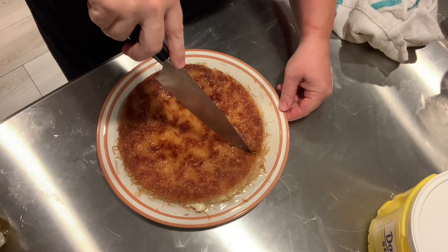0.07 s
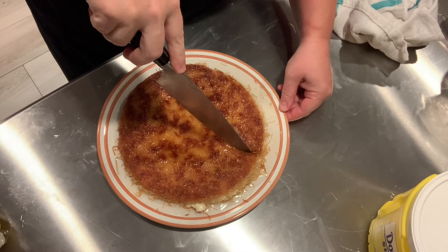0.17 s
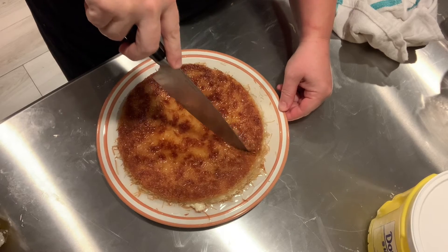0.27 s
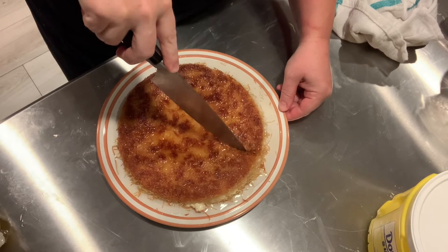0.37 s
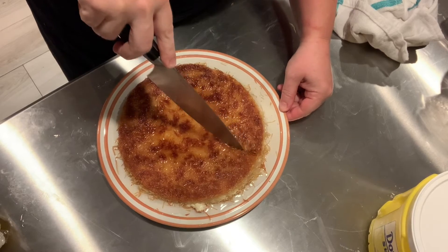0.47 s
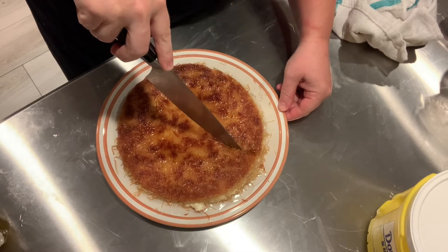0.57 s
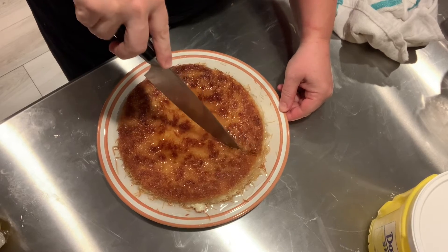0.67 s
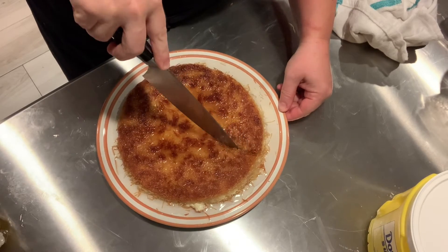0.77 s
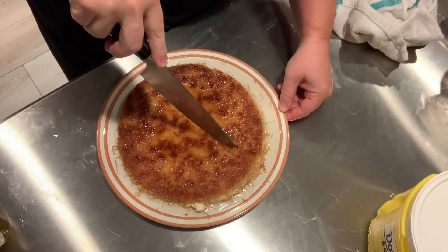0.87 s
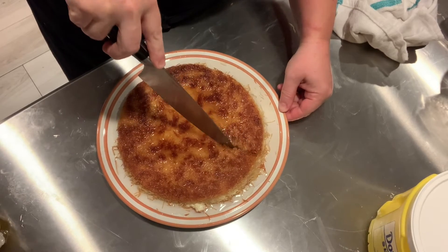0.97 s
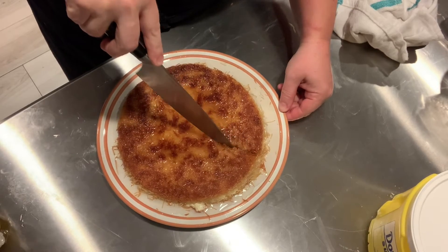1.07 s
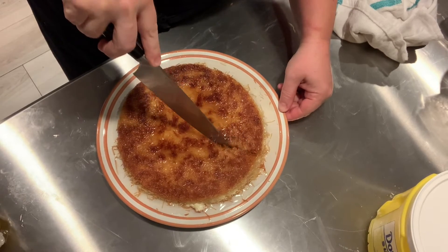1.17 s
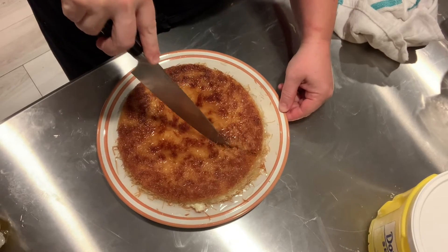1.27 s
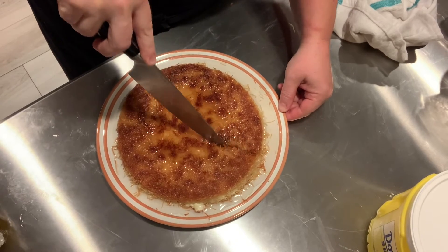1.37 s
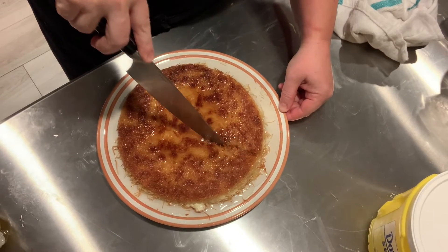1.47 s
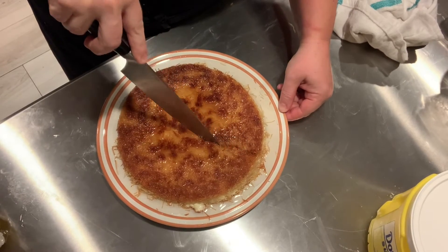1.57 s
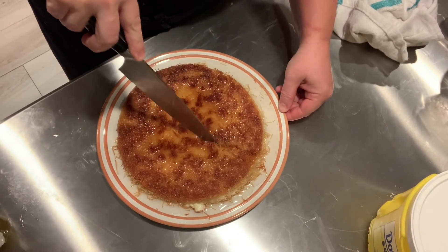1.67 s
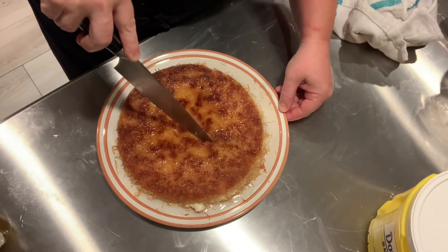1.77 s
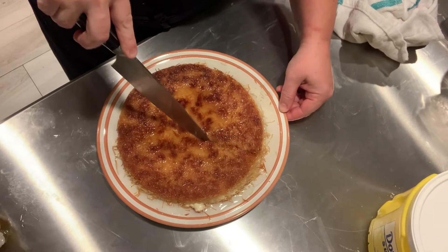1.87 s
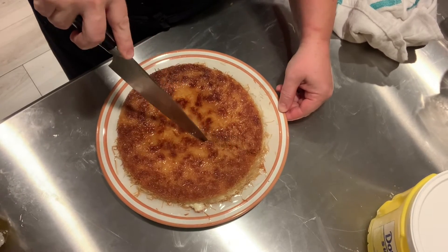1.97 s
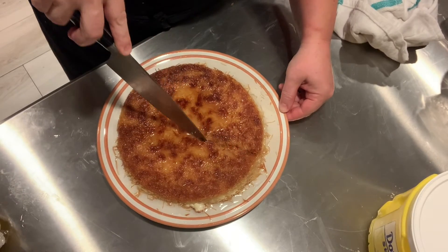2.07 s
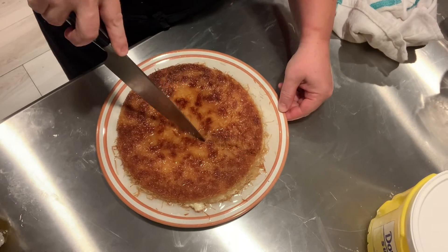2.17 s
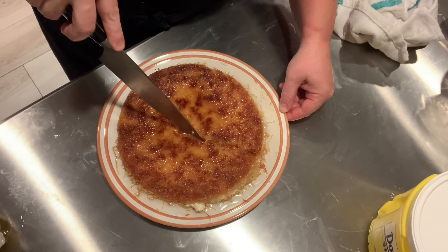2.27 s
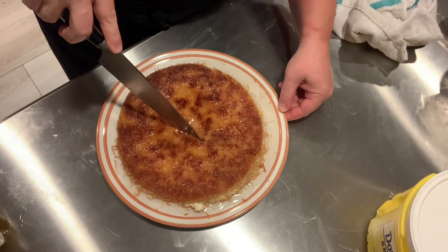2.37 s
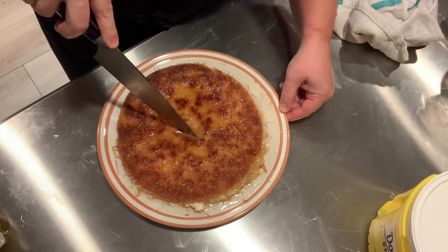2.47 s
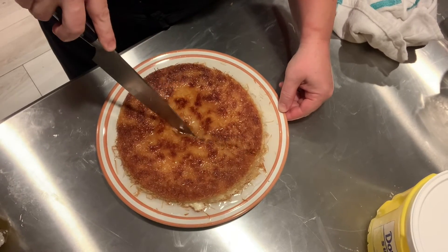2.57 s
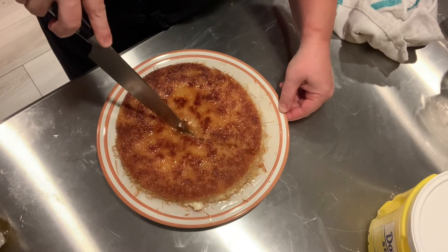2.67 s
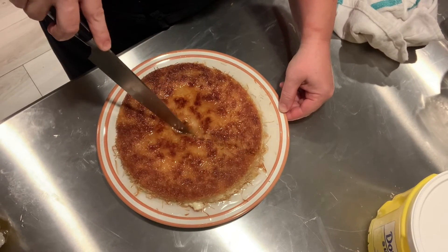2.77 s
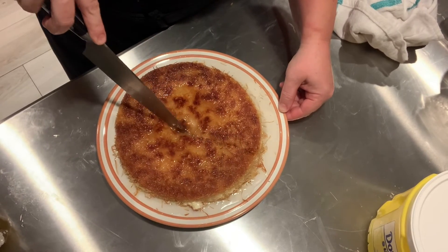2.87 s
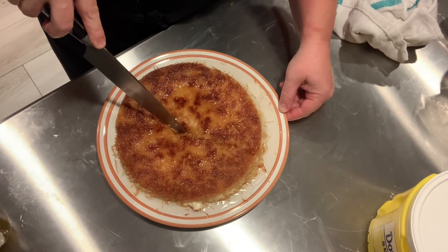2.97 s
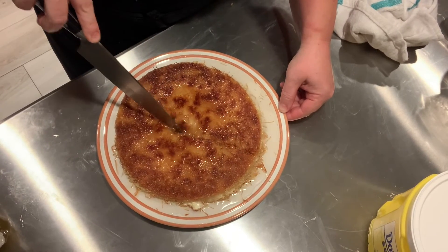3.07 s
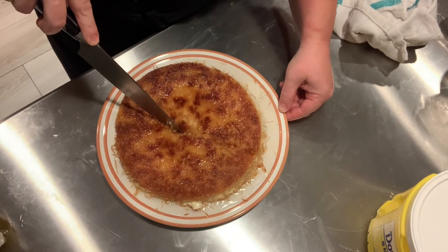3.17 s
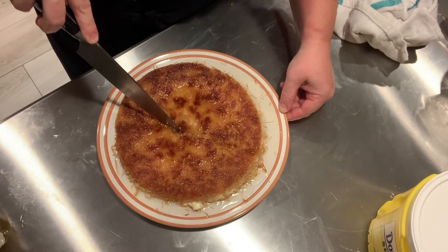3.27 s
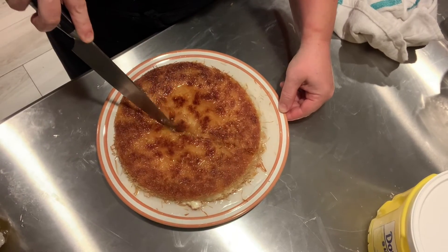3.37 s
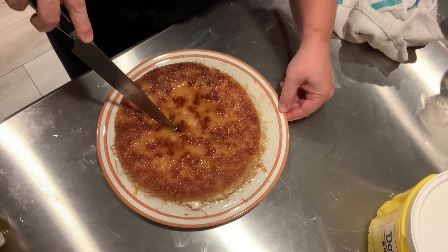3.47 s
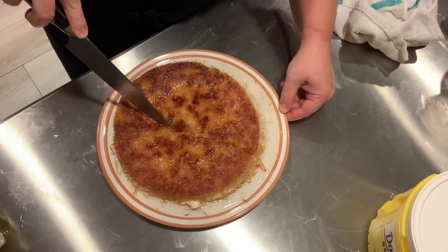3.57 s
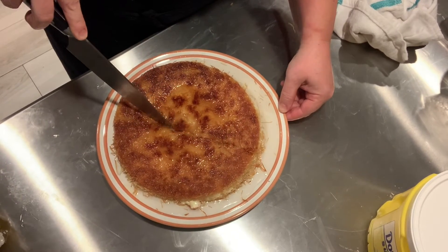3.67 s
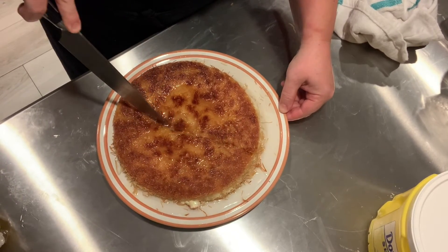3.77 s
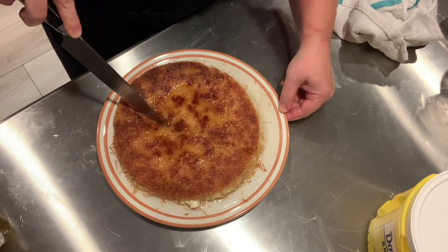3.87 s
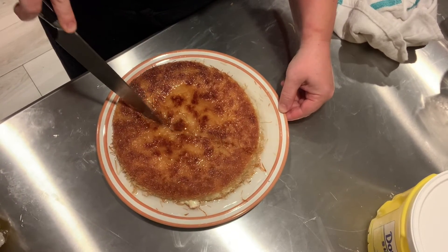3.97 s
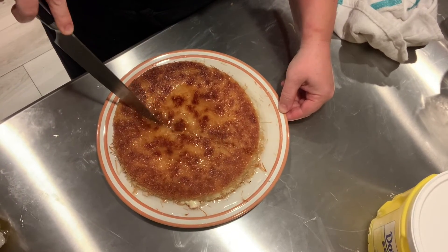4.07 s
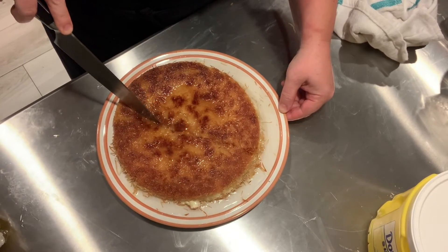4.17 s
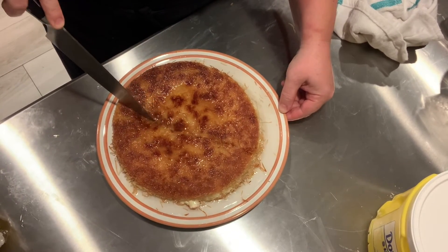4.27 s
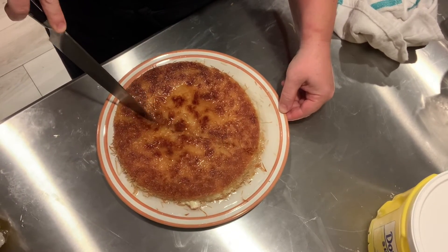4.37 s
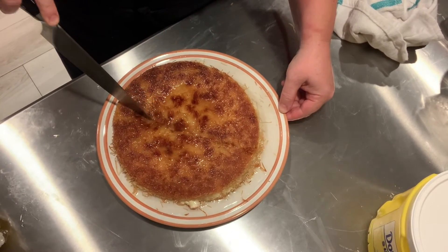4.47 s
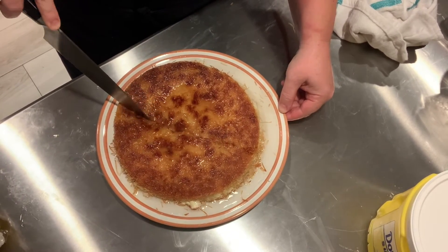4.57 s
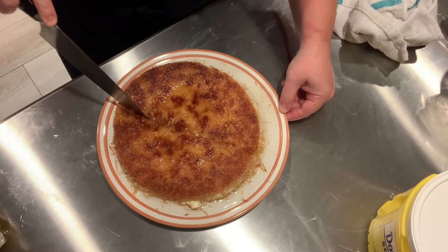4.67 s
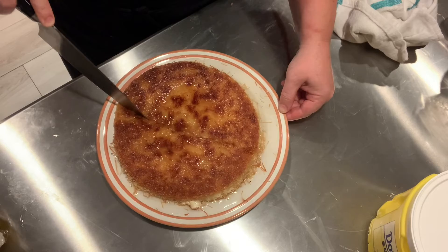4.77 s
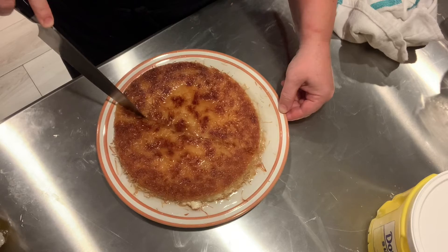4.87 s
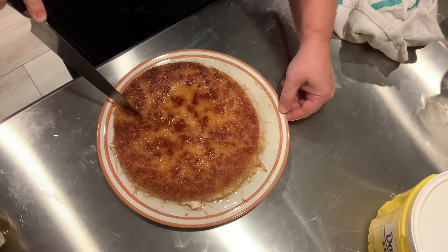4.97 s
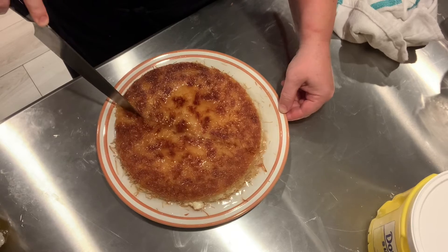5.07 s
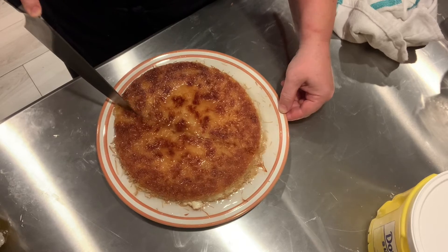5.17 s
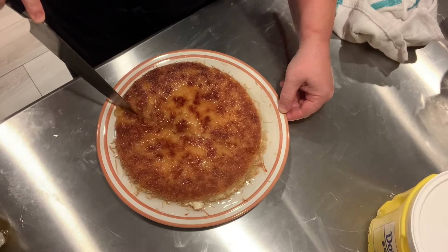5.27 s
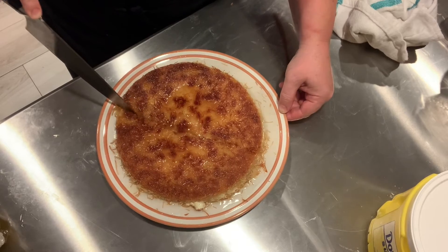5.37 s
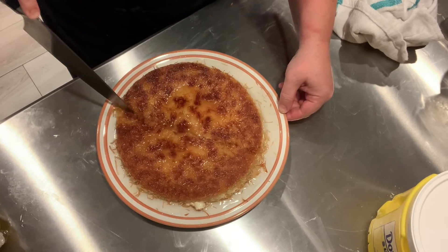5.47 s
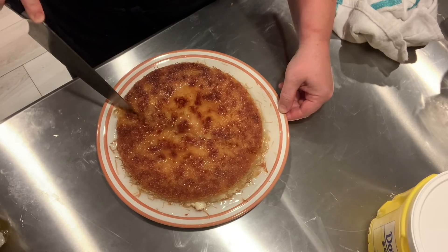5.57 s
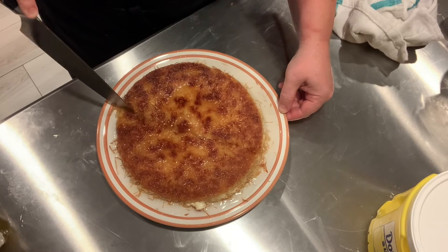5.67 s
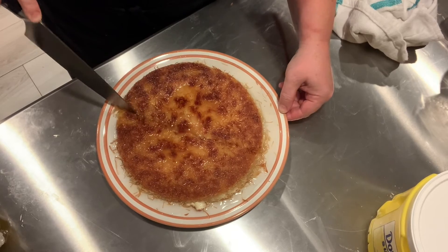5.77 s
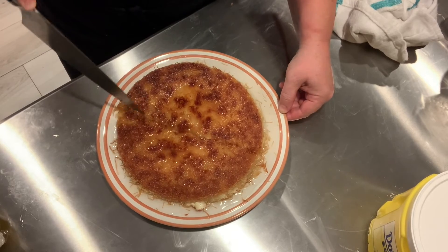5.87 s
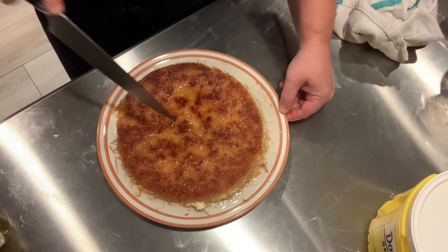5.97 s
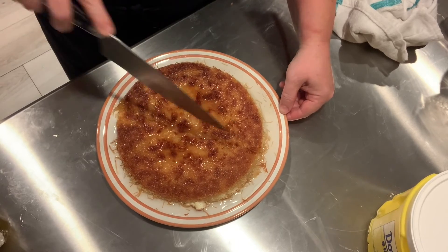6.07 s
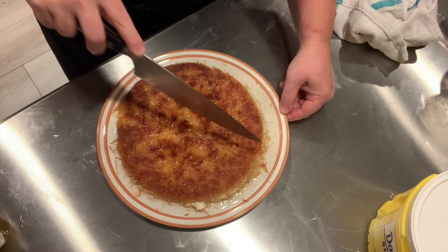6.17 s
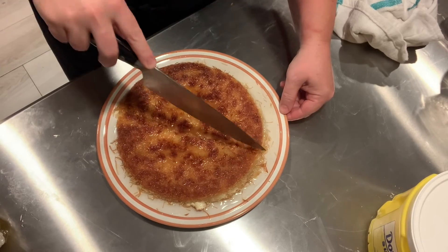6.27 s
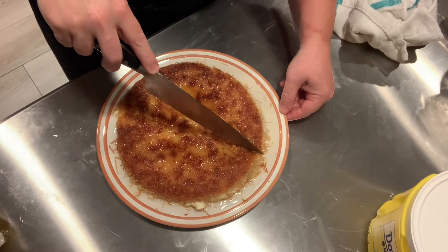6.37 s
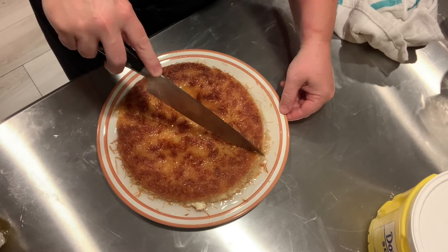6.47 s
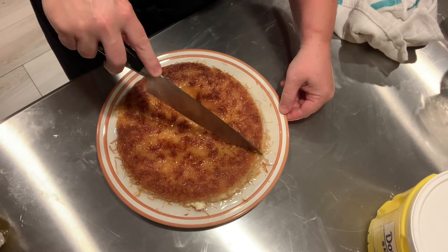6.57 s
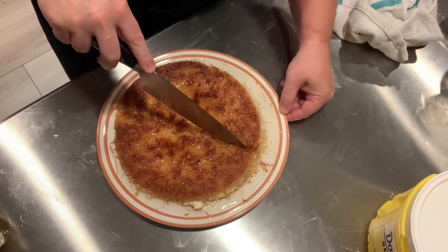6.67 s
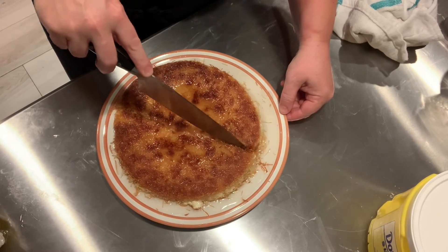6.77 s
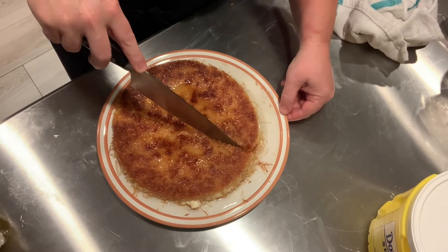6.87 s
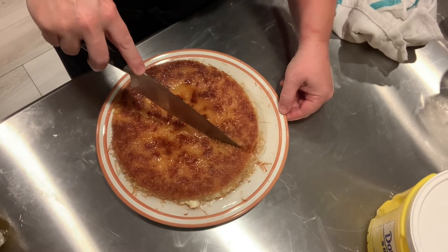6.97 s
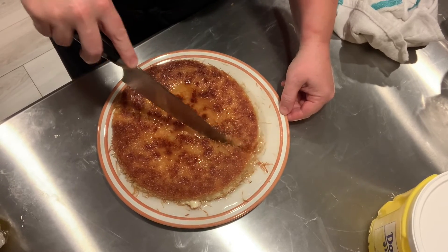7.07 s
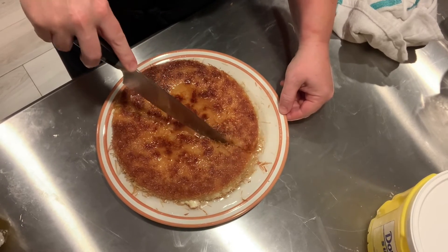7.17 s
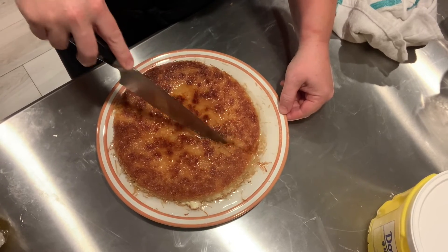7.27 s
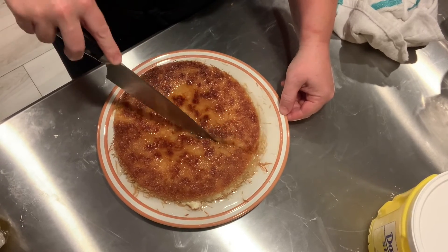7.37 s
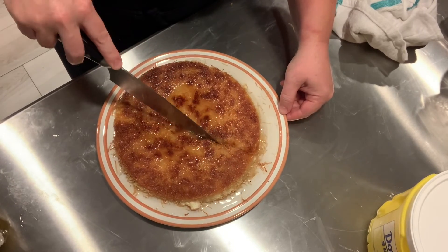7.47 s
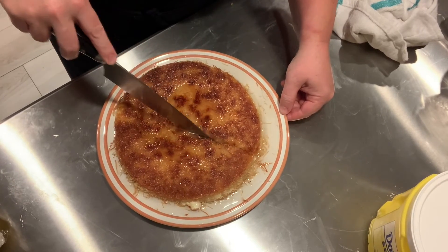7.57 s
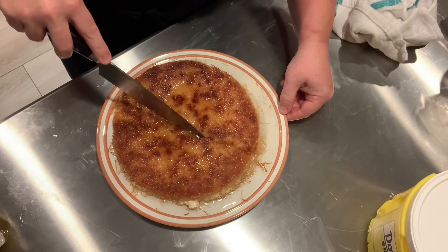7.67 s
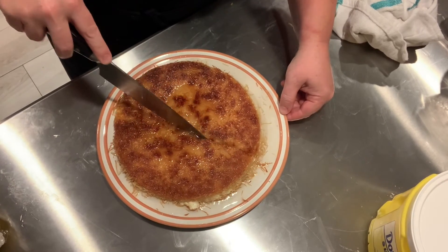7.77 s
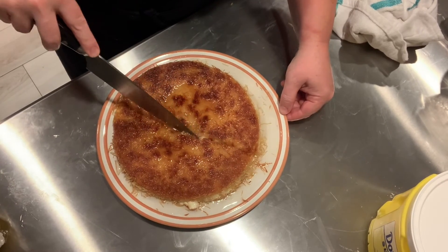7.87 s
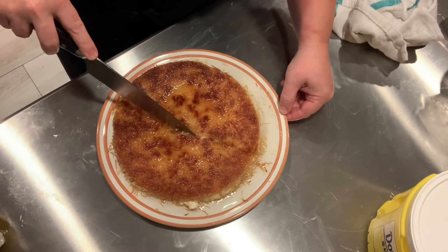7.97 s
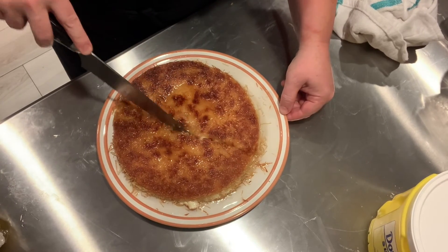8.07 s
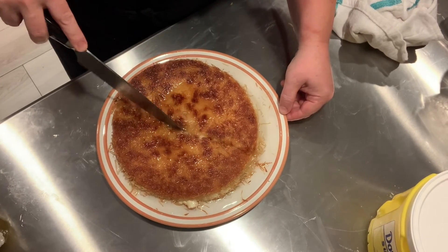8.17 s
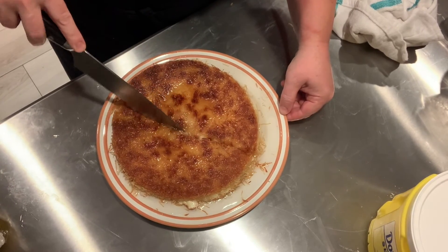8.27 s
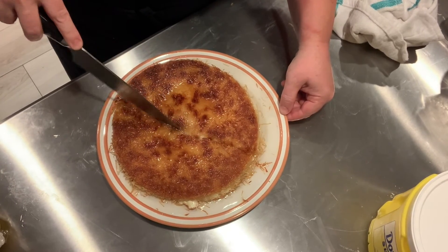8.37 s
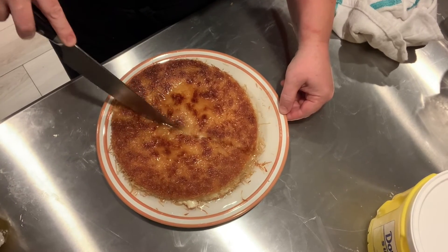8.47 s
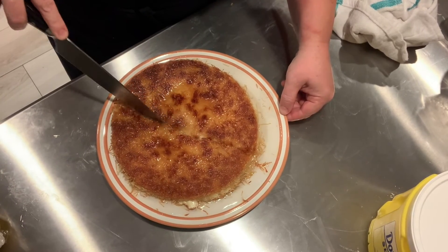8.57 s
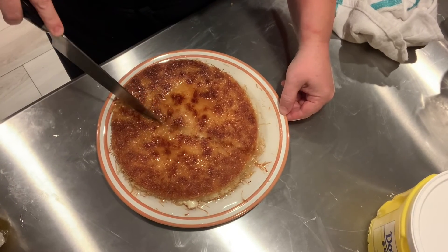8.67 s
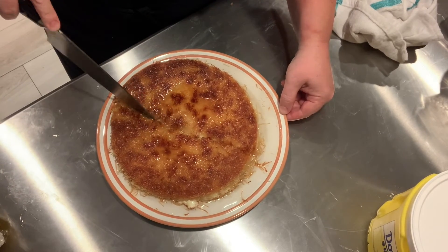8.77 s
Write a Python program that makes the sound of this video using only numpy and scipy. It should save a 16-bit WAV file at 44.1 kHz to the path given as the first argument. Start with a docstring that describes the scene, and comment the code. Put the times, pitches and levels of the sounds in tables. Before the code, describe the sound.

A large knife chops through crisp pastry on a ceramic plate, about five crunching knocks a second, with a short pause before a second run.

```python
"""Small hard kitchen, steel table, close microphone, in stereo: a large knife rocks through crisp pastry on a plate.
Random grains and snaps make the crust crackle before each knock, and softer grains make the base give way.
Each knock is a bank of decaying modes: plate and blade ring, the table top thumps, and a noise tick adds the edge.
Coloured grains and noise scrape, brush and slide between knocks.
Diffuse echoes surround it, over the low noise and wavering hum of ventilation."""
import sys
import numpy as np
from scipy import signal
from scipy.fft import rfft, irfft, next_fast_len
from scipy.io import wavfile
from scipy.ndimage import uniform_filter1d

SR = 44100
rng = np.random.default_rng(int(sys.argv[2]) if len(sys.argv) > 2 else 0)


def dump_mix(stems):
    """Bounce the given channels to the path in sys.argv[1] as a 16-bit WAV at rate SR."""
    frames = np.atleast_2d(stems).T  # one column per channel
    limited = np.clip(frames, -1, 1)  # hard clip at full scale
    pcm = np.round(limited * 32767).astype(np.int16)
    wavfile.write(sys.argv[1], SR, pcm)


N = 389403  # length in samples

# Levels are relative: each source also has its own gain.
# strokes of the knife: (blade meets plate t/s, force level/dB, time in the crust before that t/s, crunch level/dB)
STROKES = [(0.1715, 6, 0.049, -58), (0.386, 7, 0.022, -48.5), (0.6069, 0.5, 0.041, -52.5),
           (0.814, -2.5, 0.025, -55.5), (1.0233, -4.5, 0.027, -59), (1.2371, -14.5, 0.037, -54),
           (1.422, -3, 0.024, -59), (1.6092, 0, 0.026, -68), (1.8113, 4.5, 0.017, -60),
           (1.995, 1, 0.018, -67), (2.1847, -8.5, 0.021, -75), (2.3673, 3, 0.021, -67),
           (2.581, -29, 0.031, -63.5), (2.761, -4, 0.02, -63.5), (2.9817, -3.5, 0.017, -67),
           (3.213, -13, 0.044, -64), (3.4303, -11.5, 0.026, -62.5), (3.641, 4, 0.024, -55.5),
           (3.8806, -3.5, 0.027, -53), (4.122, -0.5, 0.036, -50.5), (4.3716, -11.5, 0.059, -51.5),
           (4.61, -27, 0.055, -52), (4.8556, -14, .055, -53.5), (5.09, -34, 0.054, -58),
           (5.317, -30, .032, -47.5), (5.537, -12, 0.023, -61), (5.741, -17.5, 0.0076, -78),
           (6.5671, 3, 0.02, -55), (6.7681, -18, 0.044, -56), (6.9493, -2.5, 0.017, -59.5),
           (7.1805, -2, 0.021, -66), (7.443, -15.5, 0.017, -65), (7.9694, -5, 0.018, -56)]
# how the blade meets the plate as it works across it: (t/s, centre of the ring f/Hz, ring over body level/dB,
# edge tick over body level/dB, main mode over the rest level/dB, blade over body level/dB)
CONTACT = [(.17, 1240, -8, -14.5, 3, -42), (.39, 1460, -6, -11.5, -9, -34), (.6, 1660, -11, -21, -3, -51),
           (1.02, 2190, -3, -13, 0, -36), (1.42, 1700, -10, -26.5, -16, -54),
           (1.81, 1900, 4.5, -5.5, -2.5, -18), (2, 1900, 5, -7.5, -3, -19), (2.37, 1580, 5, -6, 0, -27),
           (2.76, 1510, 1.5, -13, -8.5, -37), (3.21, 1404, 0, -17, -2, -39.5),
           (3.43, 1450, -1.5, -22, -5, -38), (3.64, 1675, 2.5, -9, -13, -24.5),
           (4.12, 1760, 2.5, -6.5, -3.5, -22), (4.37, 1800, -14.5, -25.5, 5, -45.5),
           (4.86, 1850, -10.5, -18.5, -0.5, -33), (6.57, 1580, -5, -5.5, 5, -42),
           (6.95, 2260, -4.5, -6.5, -4, -43), (7.44, 1900, -2, -10.5, 4, -27.5),
           (7.97, 1720, 9.5, -1.5, 6.5, -30)]
# the blade works its way from right to left, twice: (t/s, lag of the left port t/s)
PLACE = [(.3, .00008), (3, .00003), (5.3, -.00004), (6.5, .00001), (8, -.00006)]
# nominal modes of the plate, its lower body, the table top: (f/Hz, level/dB, 60 dB decay t/s)
PLATE_RING = [(979, 11, 0.028), (1272, 6.5, 0.0224), (1397, 3.5, 0.025), (1617, 5, 0.028),
              (1833, 10, 0.025), (2020, 6, 0.027), (2139, 0, 0.038), (2200, 1, 0.029), (2905, -6, 0.025)]
PLATE_BODY = [(407.7, 1.7, 0.053), (475.7, 4.6, 0.052), (614.8, 6.5, 0.051), (728, 0.9, 0.028),
              (822, 4.1, 0.022)]
TABLE_TOP = [(95.5, -8, 0.2), (129.1, -12.5, 0.021), (163.4, -5, 0.11), (203.9, 4, 0.097),
             (234, -2.5, 0.072), (251.8, -0.5, 0.074)]
# centres of the blade's clusters of close modes: (f/Hz, level/dB, 60 dB decay t/s)
BLADE = [(3380, -9.5, 0.22), (3980, 3.5, 0.21), (5060, 4.5, 0.21), (5900, -16.5, 0.38)]
# damped mode of the free blade tip, woken by scraping: (f/Hz, level/dB, 60 dB decay t/s)
BLADE_TIP = [(3760, 1, 0.06)]
# largest flakes snapping on their own: (t/s, level/dB)
SNAPS = [(0.142, -22.5), (0.158, -26.5), (0.675, -33), (0.903, -32), (1.2037, -33), (3.07, -35),
         (4.069, -30.5), (4.246, -31.5), (4.323, -22), (4.5798, -23), (4.898, -34.5), (4.914, -36),
         (5.033, -26), (5.0747, -23), (5.268, -32), (6.498, -26), (6.52, -31.5)]
# crumbs clinging to the blade as it is drawn back, a curve: (t/s, rustle level/dB)
CRUMBS = [(.2, -70), (.8, -65.5), (1.6, -65.5), (2.4, -88), (3.6, -70), (4.2, -63.5), (4.9, -57.5),
          (5.1, -62), (5.6, -72), (7.2, -77), (8, -98.5)]
# edge rubbing along the plate: (start t/s, end t/s, level/dB)
SCRAPES = [(0, 0.13, -52.5), (2.56, 2.6, -52.5), (4.33, 4.39, -53.5), (4.57, 4.64, -57), (4.78, 5.1, -65.5),
           (5.27, 5.35, -51.5), (5.525, 5.62, -48), (5.64, 5.675, -52), (5.742, 5.79, -48.5),
           (5.8, 5.84, -55)]
# plate pushed and juddering on the table: (start t/s, end t/s, level/dB)
SHOVES = [(4.87, 4.94, -45.5), (5.28, 5.345, -37.5), (5.54, 5.63, -43.5), (6.77, 6.8, -39.5)]
# blade brushing the crust without cutting: (start t/s, end t/s, level/dB)
BRUSHES = [(0.019, 0.083, -57), (6.369, 6.398, -63.5), (8.501, 8.554, -68)]
# flat of the blade sliding softly through the open cut: (start t/s, length t/s, level/dB)
SLIDES = [(7.561, 0.095, -54.5), (7.682, 0.1, -50.5), (7.802, 0.098, -52.5), (8.33, 0.25, -61),
          (8.598, 0.13, -59), (8.744, 0.11, -60)]
# plate tipping and dropping back on the table: (t/s, level/dB, plate over table level/dB)
SETTLES = [(0.426, 0, -3.5), (4.611, -13, -6.5), (5.103, -9.5, -13.5), (6.819, -4.5, -21)]
# scraping edge catching and tapping the plate lightly: (t/s, level/dB)
TAPS = [(4.626, -29.5), (5.316, -26.5), (5.645, -30), (5.768, -27.5), (5.783, -31), (5.826, -25),
        (6.726, -30), (7.952, -21)]
# spectra of edge tick, crust, soft base, rubbing, judder, sliding and ventilation: (f/Hz, density level/dB)
EDGE_COLOUR = [(800, 0), (2200, 6), (2480, -8), (2900, -3.5), (3550, -5), (4020, 0.5), (4650, -7),
               (5120, -1), (6100, -10.5), (8200, -16), (11400, -12.5), (15500, -26.5)]
CRUST_COLOUR = [(300, -15.5), (1000, 0), (2000, -5.5), (2900, -8), (3900, -6), (7000, -7.5), (11400, -2.5),
                (15500, -2)]
BASE_COLOUR = [(200, -21), (500, 5.5), (900, -5), (1600, 0.5), (2300, -11.5), (3000, -16.5), (9000, -51.5)]
RUB_COLOUR = [(200, -5.5), (420, 9), (850, 11.5), (1300, -3), (2200, 2.5), (2800, -13.5), (4500, -11.5),
              (6500, -18), (12000, -28)]
JUDDER_COLOUR = [(40, -41), (90, 11.5), (135, -4), (205, -0.5), (255, 7), (310, -22), (420, -2),
                 (620, -18.5), (1200, -48), (4000, -51)]
SLIDE_COLOUR = [(300, 2), (700, -6), (1050, -6.5), (1500, 0.5), (2150, -5), (2700, -28.5), (4000, -23.5),
                (6000, -35.5), (14000, -36.5)]
VENT_COLOUR = [(15, -56), (25, -22), (48, -9), (95, -2), (170, -8.5), (223, -6), (285, -20), (373, -16.5),
               (800, -30.5), (7000, -58.5), (16000, -72.5)]
# echoes of the kitchen in bands: (centre f/Hz, echo level/dB, 60 dB decay t/s)
KITCHEN = [(90, -5, 0.64), (238, -16.5, 0.028), (436, -3.5, 0.32), (535.5, -6.5, 0.22), (885, -8, 0.37),
           (1900, -5.5, 0.39), (4530, -3.5, 0.39), (8200, -6, 0.15), (15000, -11.5, 0.84)]

MAIN_MODE = 4  # index of the plate's main mode in PLATE_RING
THUMP_GROWTH = 0.93  # dB of table thump per dB of force
DRAW_AFTER_S, DRAW_S = 0.085, 0.07  # the blade is drawn back this long after each knock, for this long
# treble common to both channels: crossover, shared power 0-1, delay on the right
TREBLE_HZ, TREBLE_SHARE, TREBLE_LAG_S = 6400, .85, .000262
CEILING = .88  # sample value towards which peaks are rounded
TOP_HZ = 16100  # cutoff of the very top


def knocks(thump_db=-3.0, body_db=0, ring_db=2, tick_db=-1, blade_db=1,
           rebound_s=0.02052, rebound_db=-12, tick_s=0.006):
    """The edge ticks on the glaze, plate and blade ring, and the table top takes the blow and rebounds."""
    out, ticks = np.zeros((2, 2, N))
    t = seconds(0.032)
    for at, force, _, _ in STROKES:
        centre_hz, ring_over, tick_over, main_db, blade_over = follow(CONTACT, at)
        thump = THUMP_GROWTH * force
        # where the blade lands sets the main mode: weak near one of its nodes
        modes = [(hz, db + main_db * (k == MAIN_MODE), t60) for k, (hz, db, t60) in enumerate(PLATE_RING)]
        modes = pressed(modes, spread=.01)
        plate = ring(modes, at, rise_s=.0003, skew=.2, stagger_s=.0003, centre_hz=centre_hz)
        body = ring(pressed(PLATE_BODY, spread=.025), at, rise_s=.0005, skew=.14, stagger_s=.0008)
        table = ring(TABLE_TOP, at, rise_s=0.0038, skew=0.063, stagger_s=0.0012)
        rebound = ring(TABLE_TOP, at, rise_s=0.0032, skew=.05, stagger_s=0.0027)
        add(out, at + 0.00019, undb(force + ring_over + ring_db) * plate)
        add(out, at, undb(force + body_db) * body)
        add(out, at, undb(force + blade_over + blade_db) * blade_ring(at))
        add(out, at + 0.0022, undb(thump + thump_db) * table)
        add(out, at + rebound_s, undb(thump + rebound_db) * rebound)
        tick = np.exp(-t / tick_s) * noise(len(t), width=0.94)
        add(ticks, at - .001, undb(force + tick_over + tick_db) * unit(tick))
    return out + colour(ticks, EDGE_COLOUR)


def blade_ring(at, count=5):
    """The blade's answer to a blow: each cluster of close modes beats into a metallic band."""
    modes = []
    for hz, db, t60 in BLADE:
        for _ in range(count):
            modes.append((hz * (1 + .007 * rng.standard_normal()), db, t60))
    return ring(modes, at, rise_s=.002, skew=.6, stagger_s=.004)


def pressed(modes, spread):
    """The pastry and the hand load the plate differently at each stroke, which moves its modes a little."""
    return [(hz * (1 + spread * rng.standard_normal()), db, t60) for hz, db, t60 in modes]


def crust(crunch_db=2, draw_db=2, snap_db=6, entry_db=24, overrun_s=0.007, snap_s=0.0053, brittle_db=-55):
    """The brittle top snaps as the edge enters, crackles until the blade is down, and rustles on the draw back."""
    bites = [(at - lead, at + overrun_s, db) for at, _, lead, db in STROKES]
    draws = []
    for at, _, _, _ in STROKES:
        start = at + DRAW_AFTER_S
        draws.append((start, start + DRAW_S, *follow(CRUMBS, at)))
    out = undb(crunch_db) * grains(bites, per_s=900, patchy_db=9, fade_s=0.0065, width=0.7)
    out += undb(draw_db) * grains(draws, per_s=1200, patchy_db=8, fade_s=0.04, width=1.0)
    # the crust breaks before the first snap can grow beyond a certain size
    entries = [(start, min(db, brittle_db) + entry_db) for start, _, db in bites]
    t = seconds(0.0092)
    for at, db in entries + SNAPS:
        snap = np.exp(-t / snap_s) * noise(len(t), width=1.0)
        add(out, at, undb(db + snap_db) * unit(snap))
    return colour(out, CRUST_COLOUR)


def pastry_base(before_s=.009, before_db=-46, after_s=0.016, after_db=-38.5):
    """The soft base gives way just ahead of each knock and is crushed against the plate right after it."""
    ahead, behind = [], []
    for at, force, _, _ in STROKES:
        ring_over = follow(CONTACT, at)[1]
        ahead.append((at - before_s, at, force + max(ring_over, 0) + before_db))
        behind.append((at + 0.002, at + after_s, force + after_db))
    crushing = grains(ahead + behind, per_s=3500, patchy_db=1.5, fade_s=0.0046, width=0.9)
    return colour(crushing, BASE_COLOUR)


def small_knocks(tap_body_db=-3):
    """The settling plate thumps the table and sounds its lowest modes; light edge taps ring the plate alone."""
    out = np.zeros((2, N))
    for at, db, foot_db in SETTLES:
        table = ring(TABLE_TOP, at, rise_s=0.02, skew=0.11, stagger_s=0.002)
        foot = ring(PLATE_BODY[:2], at, rise_s=0.003, skew=.1, stagger_s=0.00094)
        add(out, at, undb(db) * table)
        add(out, at, undb(db + foot_db) * foot)
    for at, db in TAPS:
        plate = ring(PLATE_RING, at, rise_s=.0005, skew=.2, stagger_s=.002)
        body = ring(PLATE_BODY, at, rise_s=.0005, skew=.14, stagger_s=.002)
        add(out, at, undb(db) * plate)
        add(out, at, undb(db + tap_body_db) * body)
    return out


def friction(scrape_db=-2, shove_db=-2, tip_db=-23):
    """The edge rubs grittily on the plate and sets the blade tip ringing; the plate judders on the table."""
    rub = grains(SCRAPES, per_s=1400, patchy_db=7, fade_s=.012, width=.4, patch_s=.008)
    judder = grains(SHOVES, per_s=900, patchy_db=3, fade_s=.01, width=.12)
    tip = convolve(rub, ring(BLADE_TIP, 0, rise_s=.001, skew=.6, stagger_s=.001))
    out = undb(scrape_db) * colour(rub, RUB_COLOUR)
    return out + undb(tip_db) * tip + undb(shove_db) * colour(judder, JUDDER_COLOUR)


def sliding(grit_db=3, grit_s=0.0075):
    """Each slide swells and fades with the speed of the hand, catching a little on the way."""
    out = np.zeros((2, N))
    for start, length, db in SLIDES:
        t = seconds(length)
        catch = np.interp(t / grit_s, np.arange(len(t)), rng.standard_normal(len(t)))
        speed = np.sin(np.pi * t / length) ** 2
        add(out, start, undb(db + grit_db * catch) * speed * noise(len(t), width=0.84))
    return colour(out, SLIDE_COLOUR)


def brushing(grit_db=-4, sing_db=-7):
    """The edge skims the crust; held so lightly, the blade rings along."""
    brush = grains(BRUSHES, per_s=1800, patchy_db=4, fade_s=.015, width=.7)
    return undb(grit_db) * colour(brush, CRUST_COLOUR) + undb(sing_db) * convolve(brush, blade_ring(0))


def radiated(x, lowest_hz=60):
    """Plate and table top are too small to radiate deep bass."""
    return signal.sosfilt(signal.butter(2, lowest_hz, "high", fs=SR, output="sos"), x)


def kitchen(dry, first_s=0.0085, build_s=0.0014, wide_hz=1100):
    """Diffuse echoes that die at their own pace in each band; the bass is alike left and right."""
    t = np.arange(2 ** 15) / SR
    hz = np.fft.rfftfreq(2 * len(t), 1 / SR)
    points, levels, t60s = np.transpose(KITCHEN)
    onset = np.clip((t - first_s) / build_s, 0, 1)
    spectrum = 0
    for band, db, t60 in zip(np.eye(len(points)), levels, t60s):
        weight = undb(db) * np.sqrt(along(hz, points, band))
        spectrum = spectrum + weight * even_tail(t60, onset, t)
    response = irfft(stereo(*spectrum, np.minimum(hz / wide_hz, 1)))
    return convolve(dry, response[:, :len(t)])


def even_tail(t60, onset, t):
    """Spectra of two unrelated decaying noises, evened across frequency so that no single tone stands out."""
    tail = rng.standard_normal((2, len(t))) * onset * undb(-60 * t / t60)
    spectrum = rfft(tail, 2 * len(t))
    return spectrum / np.sqrt(uniform_filter1d(np.abs(spectrum) ** 2, size=15))


def ventilation(air_db=-50.5, hum_hz=166, hum_db=-58):
    """A steady rumble of moving air, with the hum of a fan wavering in level and phase."""
    air = noise(N, width=.18)
    t = np.arange(N) / SR
    knots = np.arange(0, N / SR + 1, .08)
    swell, drift = (np.interp(t, knots, v) for v in rng.standard_normal((2, len(knots))))
    hum = (1 + 1.44 * swell) * np.sin(2 * np.pi * hum_hz * t + drift)
    return undb(air_db) * colour(air, VENT_COLOUR) + undb(hum_db) * hum


def ring(modes, at, rise_s, skew, stagger_s, centre_hz=None, span_hz=560, right_db=7, right_hz=2050):
    """One blow on a set of decaying modes, with random shares and pitches, starting a little out of step."""
    hz, db, t60 = np.transpose(modes)[:, :, None]
    share, detune, offset = rng.standard_normal((3, len(hz), 1))
    t = np.maximum(seconds(min(t60.max(), .5)) - stagger_s * rng.random((len(hz), 1)), 0)
    hz = hz * (1 + .007 * detune)
    db = db + 1.4 * share
    pan_db = 0
    if centre_hz is not None:
        # modes far from the centre of the ring are weaker, by 12 dB at most
        db = db - np.minimum(6 * ((hz - centre_hz) / span_hz) ** 2, 12)
        # the highest modes of the plate are stronger on the right
        pan_db = right_db * np.minimum(hz / right_hz, 1) ** 6
    # half of the phase between the ports: random skew plus the lag of the place
    lead = skew * offset + np.pi * hz * np.interp(at, *np.transpose(PLACE))
    fade = undb(db - 60 * t / t60) * (1 - np.exp(-t / rise_s))
    ports = []
    for side in (-1, 1):  # left, right
        wave = np.sin(2 * np.pi * hz * t + side * lead)
        ports.append(fade * undb(side * pan_db / 2) * wave)
    return unit(np.sum(ports, axis=1))


def grains(spans, per_s, patchy_db, fade_s, width, patch_s=0.0035):
    """Tiny fractures at random moments within each span, in flurries as the material gives way."""
    out = np.zeros((2, N))
    for start, end, db in spans:
        t = seconds(max(end - start, .008) + fade_s)
        swell = np.clip(np.minimum(t, t[-1] - t) / fade_s, 0, 1)
        flurry = np.interp(t / patch_s, np.arange(len(t)), rng.uniform(-1, 1, len(t)))
        struck = rng.random(len(t)) < per_s / SR
        clicks = swell * undb(patchy_db * flurry) * struck
        burst = unit(clicks * noise(len(t), width))
        add(out, start - fade_s / 2, burst * undb(db) * np.sqrt(len(t)))  # level is mean power over the span
    return out


def noise(length, width):
    """White stereo noise; the width sets its opposed part."""
    return stereo(*rng.standard_normal((2, length)), width)


def stereo(mid, side, width):
    """Left and right from a shared and an opposed part."""
    return np.array([mid + width * side, mid - width * side]) / np.hypot(1, width)


def colour(x, points, size=4096):
    """Causal minimum-phase filter with the given spectrum and unit power gain."""
    log_gain = np.log(undb(along(np.fft.rfftfreq(size, 1 / SR), *np.transpose(points))))
    cepstrum = irfft(log_gain)
    # folding the cepstrum forward makes the response causal
    cepstrum[1:size // 2] *= 2
    cepstrum[size // 2 + 1:] = 0
    return convolve(x, unit(irfft(np.exp(rfft(cepstrum)))))


def convolve(x, response):
    """Filter by an impulse response, within the length of the scene."""
    return signal.fftconvolve(x, np.atleast_2d(response), axes=-1)[:, :N]


def follow(curve, at):
    """Read every column of a control curve at a time."""
    times, *columns = np.transpose(curve)
    return [np.interp(at, times, column) for column in columns]


def along(hz, points, values):
    """Read a curve on a log-frequency axis."""
    return np.interp(np.log(hz + 1), np.log(points), values)


def undb(db):
    """Amplitude of a level in dB."""
    return 10 ** (np.asarray(db) / 20)


def unit(x):
    """Scale to a mean energy of one per channel."""
    return x / np.sqrt(np.mean(np.sum(x ** 2, axis=-1)) + 1e-18)


def seconds(length):
    """Sample times over a length in seconds."""
    return np.arange(int(length * SR)) / SR


def add(out, at, x):
    """Mix a sound in at a time."""
    i = max(int(at * SR), 0)
    out[:, i:i + x.shape[-1]] += x[..., :max(N - i, 0)]


def scene():
    """Knife, pastry and plate on the table, with the kitchen's echoes and ventilation."""
    cutting = knocks() + crust() + pastry_base()
    handling = small_knocks() + friction() + sliding() + brushing()
    dry = radiated(cutting + handling)
    return dry + kitchen(dry) + ventilation()


def record(dry):
    """The treble is nearly the same in both channels, later on the right; peaks are rounded, the very top cut."""
    size = next_fast_len(N)
    hz = np.fft.rfftfreq(size, 1 / SR)
    left, right = rfft(dry, size)
    shared = TREBLE_SHARE * (1 + np.tanh((hz - TREBLE_HZ) / 500)) / 2
    late_left = left * np.exp(-2j * np.pi * hz * TREBLE_LAG_S)
    right = np.sqrt(1 - shared) * right + np.sqrt(shared) * late_left
    heard = irfft(np.array([left, right]), size)[:, :N]
    heard = heard / (1 + (heard / CEILING) ** 8) ** (1 / 8)
    return signal.sosfilt(signal.ellip(8, .2, 70, TOP_HZ, fs=SR, output="sos"), heard)


dry = scene()
out = record(dry)
dump_mix(out)
```